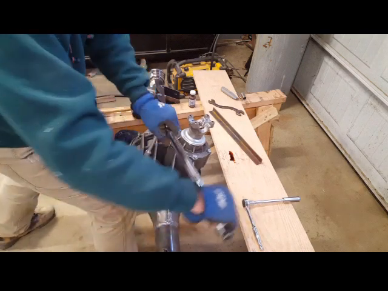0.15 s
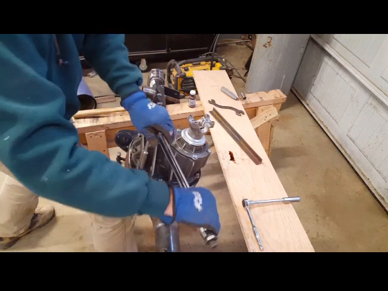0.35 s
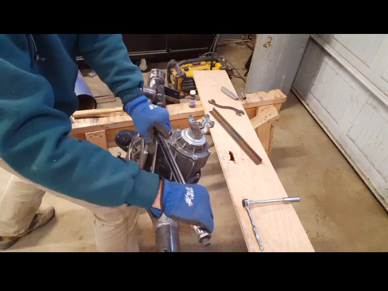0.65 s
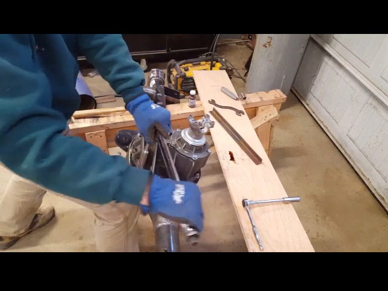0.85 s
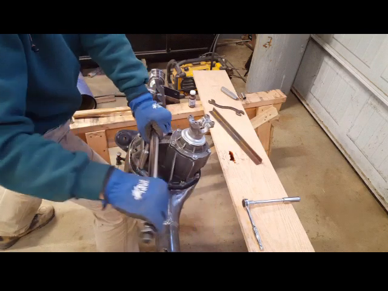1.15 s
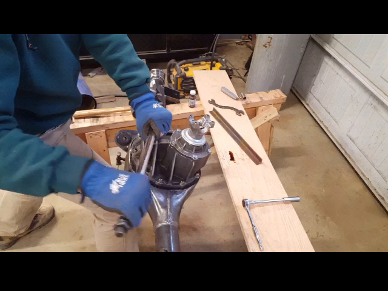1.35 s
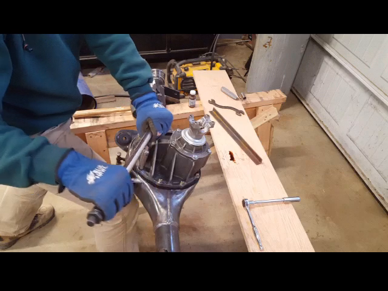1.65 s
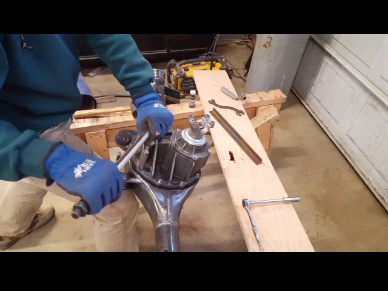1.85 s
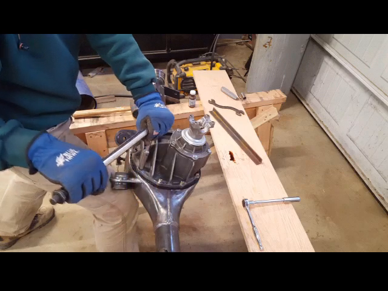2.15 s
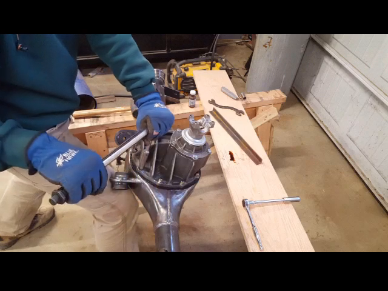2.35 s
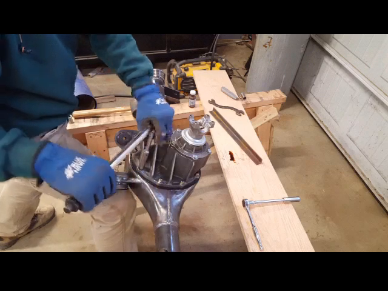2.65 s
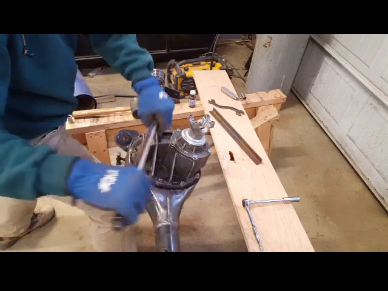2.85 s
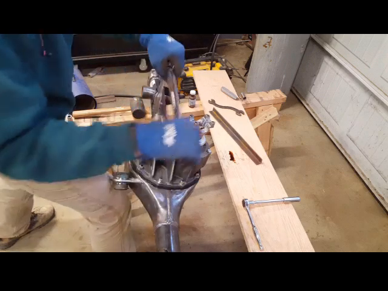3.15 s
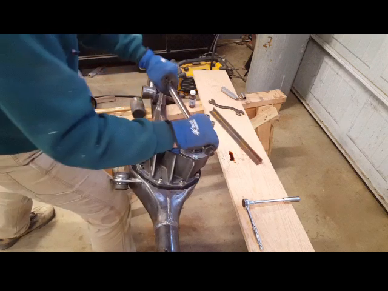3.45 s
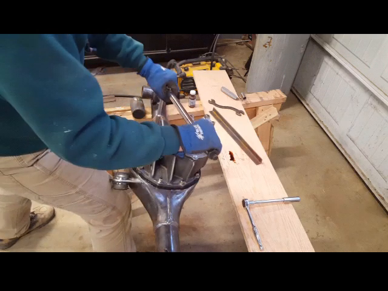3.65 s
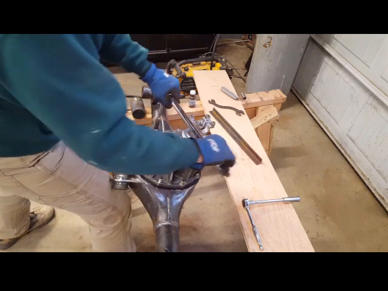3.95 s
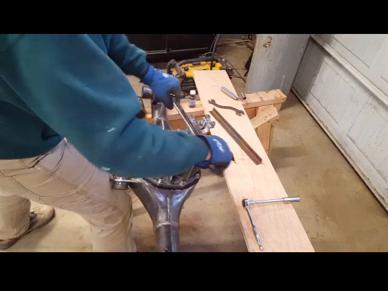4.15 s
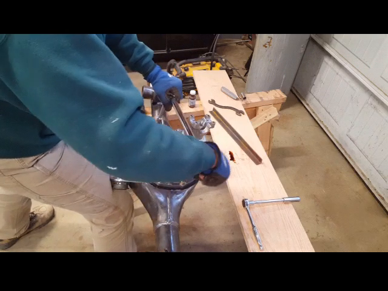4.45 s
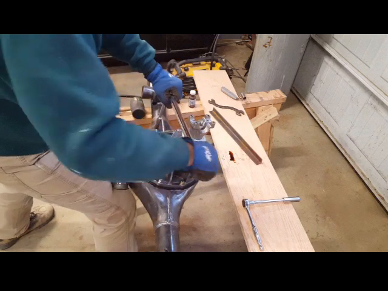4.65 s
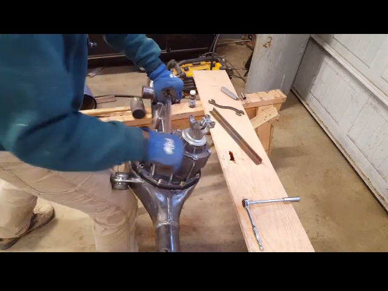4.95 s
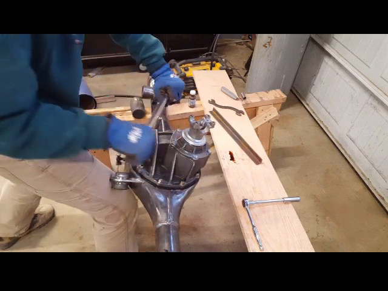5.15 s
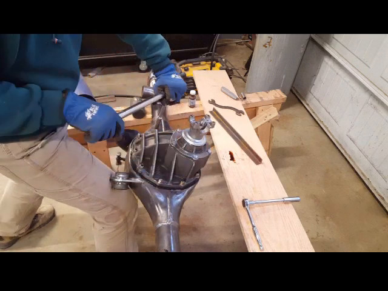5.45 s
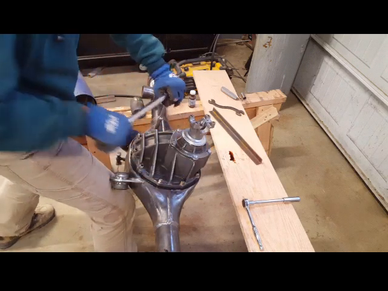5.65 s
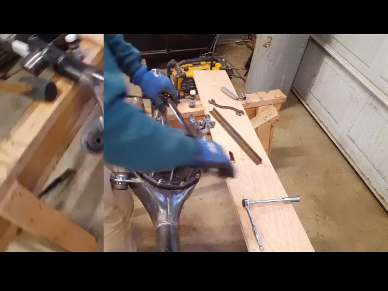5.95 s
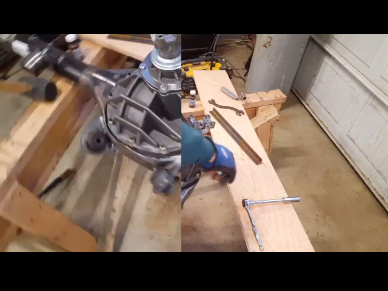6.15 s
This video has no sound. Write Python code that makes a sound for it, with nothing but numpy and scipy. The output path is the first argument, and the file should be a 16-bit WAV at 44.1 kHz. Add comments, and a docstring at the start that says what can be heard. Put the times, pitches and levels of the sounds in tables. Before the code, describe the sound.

Ratchet ticks and cloth rustle, then a torque wrench clicks loudly and snaps back; metal knocks ring on a heavy housing in a garage.

```python
"""A ratchet ticks over a quiet rumble while sleeves rustle, then a socket knocks on nuts and an axle housing.
A click-type torque wrench breaks over with a sharp click and snaps back; more knocks and ticks follow,
and a last click, cut short, begins just before the end. The housing rests on a wooden stand in a hard garage.
Each blow is filtered noise with a bass push, plus decaying modes of the wrench, ratchet head, housing
or axle tube; cloth and still air are coloured noise."""
import sys
import numpy as np
from scipy import signal
from scipy.fft import rfft, irfft
from scipy.io import wavfile
from scipy.ndimage import uniform_filter1d

SR = 44100
rng = np.random.default_rng(int(sys.argv[2]) if len(sys.argv) > 2 else 0)


def wav_out(sig):
    """Save sig, one row per channel (or a flat mono array), as 16-bit PCM at SR to the path in sys.argv[1]."""
    wavfile.write(sys.argv[1], SR, np.round(np.clip(np.atleast_2d(sig).T, -1, 1) * 32767).astype(np.int16))


N = 277561
BLOW_TIME = np.arange(SR) / SR  # seconds since a blow


def amp(db):
    """Decibel law: level to amplitude gain."""
    return 10 ** (np.asarray(db) / 20)


def unit(x):
    """Power normalisation: scales to rms 1."""
    return x / np.sqrt(np.mean(x ** 2) + 1e-20)


def read(points, hz):
    """Log-frequency interpolation of a table."""
    table_hz, value = np.transpose(points)
    return np.interp(np.log(hz + 1), np.log(table_hz + 1), value)


def fade(t, t60):
    """Exponential decay: 60 dB down after t60 seconds."""
    return np.exp(-np.log(1000) * t / np.maximum(t60, 1e-3))


def add(mix, start_s, sound):
    """Superposition: mixes a stereo sound in, dropping whatever falls outside the mix."""
    start = round(start_s * SR)
    sound = sound[:, max(-start, 0):]
    part = mix[:, max(start, 0):][:, :sound.shape[1]]
    part += sound[:, :part.shape[1]]


def blend(a, b, same):
    """Partial correlation: mixes independent b into a so that their likeness is same."""
    return same * a + np.sqrt(1 - same ** 2) * b


# likeness of sound at the two microphones: frequency_hz, likeness (1 = identical)
LIKENESS = [(60, .92), (290, .92), (640, .5), (1400, .2), (3000, 0)]


def pair_noise(size, likeness=LIKENESS):
    """Spatial coherence: white noise at two spaced microphones, alike in the bass, unrelated in the treble."""
    a, b = rfft(rng.standard_normal((2, size)))
    same = np.clip(read(likeness, np.fft.rfftfreq(size, 1 / SR)), -1, 1)
    return irfft(np.array([a, blend(a, b, same)]), size)


def coloured(x, db_at, size=4096):
    """Minimum-phase filtering: a causal, unit-energy filter with the relative response db_at(Hz)."""
    db = db_at(np.fft.rfftfreq(size, 1 / SR))
    cepstrum = irfft(np.log(amp(np.maximum(db - db.max(), -90))))
    # folding the cepstrum onto positive times makes the filter causal
    cepstrum[1:size // 2] *= 2
    cepstrum[size // 2 + 1:] = 0
    taps = irfft(np.exp(rfft(cepstrum)))
    taps /= np.linalg.norm(taps)
    return signal.fftconvolve(x, taps[None], axes=1)[:, :x.shape[1]]


# late decay of the garage: frequency_hz, t60_s
GARAGE_T60 = [(100, 2), (300, 0.89), (1000, 0.67), (2700, 0.84), (5000, 0.46), (9000, 0.44), (14000, 0.02)]
# reverberant over direct sound: frequency_hz, level_db
GARAGE_DB = [(150, 18), (400, 17), (900, 4.5), (2500, -4.5), (6000, -2), (13000, -6.5)]


def garage(x, build_s=0.0043, bass_lag=0.55, early_db=3, early_t60=0.16, bass_hz=450):
    """Room reverberation: direct sound, early reflections and a tail; bass builds last, power is shared."""
    hz, t, noise = signal.stft(pair_noise(SR), SR, nperseg=256)
    hz = hz[:, None]
    shape = fade(t, read(GARAGE_T60, hz)) + amp(early_db) * fade(t, early_t60)
    build = build_s * (1 + bass_lag / (1 + (hz / bass_hz) ** 2))
    shape *= 1 - np.exp(-(t / build) ** 2)
    shape /= np.sqrt((shape ** 2).sum(1, keepdims=True) * t[1] * SR)
    tail = signal.istft(noise * shape, SR, nperseg=256)[1][:, :SR]
    wet = amp(read(GARAGE_DB, np.fft.rfftfreq(2 * SR, 1 / SR)))
    response = (1 + wet * rfft(tail, 2 * SR)) / np.sqrt(1 + wet ** 2)
    return irfft(rfft(x, 2 * SR) * response)[:, :SR]


def treble_tilt(tilt, hz):
    """Contact hardness: a dB slope of tilt per octave, settling in above about 1500 Hz."""
    return tilt * np.log2(np.hypot(1, hz / 1500))


def contact(colour, t60, tilt, bass_db=0, clank_hz=1000, clank_db=0, rise_s=.0005, push_hz=900,
            clank_octaves=0.083):
    """Impact of steel on steel: one push in the bass, dense fast-dying vibration above."""
    clatter = pair_noise(SR) * fade(BLOW_TIME, t60) * (1 - np.exp(-BLOW_TIME / rise_s))
    push = np.linalg.norm(clatter[0]) * (BLOW_TIME == 0)
    low = signal.butter(2, push_hz, "low", fs=SR)
    high = signal.butter(2, push_hz, "high", fs=SR)
    blow = signal.lfilter(*low, push) + signal.lfilter(*high, clatter)

    def db_at(hz):
        """Additive decibels: contact colour, hardness, bass thump and the struck spot's own resonance."""
        thump = bass_db / (1 + (hz / 400) ** 2)
        octaves_away = np.log2((hz + 1) / clank_hz)
        clank = clank_db / (1 + (octaves_away / clank_octaves) ** 2)
        return read(colour, hz) + treble_tilt(tilt, hz) + thump + clank
    return garage(coloured(blow, db_at))


def ring(modes, rise_s, waver):
    """Modal decay: reflections make each mode flutter, high ones faster and less alike at the microphones."""
    out = np.zeros((2, SR))
    for hz, db, t60 in modes:
        knots = np.linspace(0, 1, num=round(2 * np.sqrt(hz)))  # times of the flutter's random values
        same = np.clip(read(LIKENESS, hz), -1, 1)
        offset = np.arccos(same) * rng.choice([-1, 1])
        phase = rng.uniform(0, 2 * np.pi) + np.array([[0], [offset]])
        draws = rng.standard_normal(size=(2, 2, 256))[..., :len(knots)]
        left, other = (np.interp(BLOW_TIME, knots, a + 1j * b) for a, b in draws)
        echoes = np.array([left, blend(left, other, same)])
        carrier = np.exp(1j * phase) * np.exp(2j * np.pi * hz * BLOW_TIME)
        out += amp(db) * fade(BLOW_TIME, t60) * ((1 + waver * echoes) * carrier).real
    return out * (1 - np.exp(-BLOW_TIME / rise_s))


# colour of the still air: frequency_hz, relative_level_db_per_hz
AIR = [(20, -17), (30, -17), (56, -4), (110, -7), (180, -12), (440, -17), (900, -20), (1700, -22.5),
       (5000, -27.5), (7000, -30), (14500, -32)]
# likeness of the air at the two microphones: frequency_hz, likeness
AIR_LIKENESS = [(60, .85), (130, .6), (290, .25), (640, 0)]
AIR_DB = -68.7  # rms level


def air():
    """Stationary noise: a low rumble under a faint even hiss."""
    noise = pair_noise(N, AIR_LIKENESS)
    return amp(AIR_DB) * unit(coloured(noise, lambda hz: read(AIR, hz), size=16384))


# lowest bending mode of the long axle tube: frequency_hz, level_db, t60_s
AXLE_TUBE = [(316, 0, .68)]


def tube_hum():
    """Lowest bending mode: the axle tube's low, hollow note."""
    return ring(AXLE_TUBE, rise_s=.015, waver=.25)


# wrench modes: frequency_hz, loaded_level_db, slack_level_db, t60_s
WRENCH = [(346, -10, -22, .45), (866, 3, -20, .3), (960, -10, -9, .33), (1075, -7, 5, .53),
          (1098, -9, -3, .3), (1880, -16, -8, .28), (2030, -4, -12, .3), (2240, -16, -11, .35),
          (2610, -6, -6, .3), (2668, 1, -1, .43), (3050, -9, -13, .3), (3535, -10, -4, .23),
          (3595, -14, -1, .23), (4180, 2, -12, .24), (4654, -6, -16, .2), (5478, -12, -7, .26),
          (6300, -16, -6, .2), (7900, -6, -9, .2), (8527, -12, -5, .17), (9360, -5, -7, .2),
          (9749, -9, -1, .21)]


def wrench_ring(load, tilt=0):
    """Boundary conditions: clamping on the nut rebalances the wrench's modes; a soft blow spares high ones."""
    load = np.clip(load, 0, 1)
    modes = []
    for hz, tight_db, slack_db, t60 in WRENCH:
        mode_db = load * tight_db + (1 - load) * slack_db + treble_tilt(tilt, hz)
        modes.append((hz, mode_db, t60))
    return ring(modes, rise_s=.003, waver=.5)


# ratchet head modes: frequency_hz, level_db, t60_s
RATCHET = [(1650, -4, .25), (1965, -2, .24), (2630, -3, .24), (4240, -4, .2), (5170, -3, .2),
           (5830, -3, .18), (8280, 2, .2)]


def head_ring():
    """Modal vibration of the ratchet head."""
    return ring(RATCHET, rise_s=0.0012, waver=1.0)


# pawl dropping over ratchet teeth: start_s, level_db, treble_tilt_db_per_octave
TICKS = [(-.06, -27, 7), (0.0254, -29.5, 5), (0.1122, -28.5, 5), (2.9957, -38, 0), (3.0429, -41, -3.5),
         (3.172, -42.5, 0.5), (4.488, -36, -0.5), (4.758, -43, -1.5), (6.0833, -55, 9.5), (6.1381, -29, 7),
         (6.1977, -28.5, 7.5)]
# colour of a tick: frequency_hz, relative_level_db_per_hz
TICK_COLOUR = [(100, -14), (250, -7), (650, -1), (1200, -5.5), (2200, 3.5), (4000, -6), (6800, -13.5),
               (8400, -12), (11000, -19.5), (14500, -29)]
PAWL_T60_S, PAWL_HUM_DB = 0.032, -34.5  # clatter decay; tube hum over the snap
# ringing over the snap (dB), and its change per dB/octave of tilt
HEAD_DB, HEAD_DB_PER_TILT = -33, 1.7
HANDLE_DB, HANDLE_DB_PER_TILT = -27.5, -1.0


def ticks():
    """Impact excitation: the pawl snaps onto the next tooth; crisp snaps ring the head, dull ones the handle."""
    out = np.zeros((2, N))
    for start_s, db, tilt in TICKS:
        snap = contact(TICK_COLOUR, PAWL_T60_S, tilt, rise_s=0.00015)
        head = amp(HEAD_DB + HEAD_DB_PER_TILT * tilt) * head_ring()
        handle = amp(HANDLE_DB + HANDLE_DB_PER_TILT * tilt) * wrench_ring(0)
        hum = amp(PAWL_HUM_DB) * tube_hum()
        add(out, start_s, amp(db) * (snap + head + handle + hum))
    return out


# sleeves and trousers moving: middle_s, half_length_s, level_db
RUSTLES = [(0.184, 0.21, -61.5), (0.742, 0.27, -67), (4.666, 0.28, -60.5), (5.495, 0.28, -72),
           (5.939, 0.19, -67), (6.068, 0.1, -62)]
# colour of rubbing cloth: frequency_hz, relative_level_db_per_hz
CLOTH = [(59, -52), (100, -21.5), (162, -11), (262, -14), (310, -7.5), (462, -11), (962, -14.5),
         (1160, -17), (8000, -29.5), (15000, -43.5)]


def rustle(grain_db=1.0):
    """Friction noise: cloth rubs in small uneven catches, swelling with each movement."""
    t = np.arange(N) / SR
    motion = sum(amp(db) * np.exp(-((t - middle_s) / half_s) ** 2) for middle_s, half_s, db in RUSTLES)
    catches = unit(uniform_filter1d(rng.standard_normal(N), size=400))
    rubbing = pair_noise(N) * amp(grain_db * catches)
    return motion * unit(coloured(rubbing, lambda hz: read(CLOTH, hz)))


# axle housing modes: frequency_hz, level_db, t60_s
HOUSING = [(604, 0, .5), (643, 1, .5), (744, -7, .4), (928, -3, .35), (1048, -4, .33), (1075, -11, .45),
           (1256, -8, .42), (1444, -8, .42), (1620, -8, .45), (1743, -6, .38), (2190, -13, .4),
           (2850, -13, .42), (3016, -10, .42)]


def housing_ring():
    """Inertia: the heavy housing takes a moment to start ringing."""
    return ring(HOUSING, rise_s=0.0038, waver=0.89)


# socket knocking on nuts and housing: start_s, level_db, treble_tilt_db_per_octave, clatter_t60_s,
# clank_pitch_hz, housing_ring_over_blow_db, tube_hum_over_blow_db
KNOCKS = [(0.3856, -41.5, -5, 0.043, 1010, -22.5, -19.5), (1.0412, -55, 2.5, 0.025, 1300, -38, -33),
          (1.0742, -26.5, -7, 0.034, 1430, -53, -47), (3.074, -45, -2.5, 0.12, 2300, -35, -35),
          (3.0895, -37, -3.5, 0.063, 1010, -48, -39), (3.9341, -29.5, 0, 0.071, 680, -17, -19.5),
          (4.0302, -31, 1.5, 0.13, 4800, -24.5, -4.5), (4.178, -20, 1.5, .16, 1037, -20, -36),
          (4.2033, -20, 2.5, 0.082, 2700, -10.5, -15.5), (4.283, -32.5, -9.5, 0.065, 604, -7.5, -5.5),
          (4.783, -52, -5, 0.071, 756, -19, -15.5), (5.944, -54.5, -4, .16, 960, -28, -6)]
# colour of a knock: frequency_hz, relative_level_db_per_hz
KNOCK_COLOUR = [(40, -31), (80, -16), (170, -10), (450, -12), (650, -9), (1050, -7), (1900, -11.5),
                (3000, -13.5), (4600, -20), (9500, -28), (14500, -37)]
KNOCK_CLANK_DB, KNOCK_CLANK_OCTAVES = 8, 0.19  # height and half-width of the struck spot's resonance
# the stand thumps more for a gentle blow and for one that rings the housing well
THUMP_DB, THUMP_PER_HOUSING_DB, THUMP_PER_LEVEL_DB = -1, 0.18, -0.1352
# wrench over the blow (dB), extra treble tilt (dB/octave), load (0-1)
JOLT_DB, JOLT_TILT, JOLT_LOAD = -22.5, -0.5, 0.46


def knocks():
    """Coupled vibration: the struck housing rings and thumps its wooden stand; the jolt rings the wrench."""
    out = np.zeros((2, N))
    for start_s, db, tilt, t60, clank_hz, housing_db, hum_db in KNOCKS:
        bass_db = THUMP_DB + THUMP_PER_HOUSING_DB * housing_db + THUMP_PER_LEVEL_DB * db
        blow = contact(KNOCK_COLOUR, t60, tilt, bass_db, clank_hz, KNOCK_CLANK_DB,
                       rise_s=0.00049, clank_octaves=KNOCK_CLANK_OCTAVES)
        jolt = amp(JOLT_DB) * wrench_ring(JOLT_LOAD, tilt + JOLT_TILT)
        housing = amp(housing_db) * housing_ring()
        hum = amp(hum_db) * tube_hum()
        add(out, start_s, amp(db) * (blow + jolt + housing + hum))
    return out


# wrench breaking over and snapping back: start_s, level_db, treble_tilt_db_per_octave, clank_pitch_hz,
# load (0 slack - 1 clamped)
CLICKS = [(2.4157, -12, 1, 877, 0.73), (2.7095, -11, 3, 1085, 0.01), (2.7152, -19.5, 1, 3600, 0.07),
          (6.2889, -15.5, -4.5, 1220, 0.5)]
# colour of a click: frequency_hz, relative_level_db_per_hz
CLICK_COLOUR = [(50, -38), (110, -21.5), (175, -15.5), (240, -25), (400, -22), (750, -13), (1500, -13.5),
                (2600, -7.5), (4200, -14), (5200, -18), (9700, -15.5), (14500, -29.5)]
SLAP_T60_S, SLAP_CLANK_DB, SLAP_RING_DB = 0.054, 7, -23.5  # clatter decay; clank height; ring over slap
SLACK_HUM_DB, LOAD_DAMPING_DB = -28.5, 23.5  # slack tube hum over slap; its loss at full load


def clicks():
    """Sudden release: the mechanism slips and slaps the handle tube; a slack wrench also shakes the axle tube."""
    out = np.zeros((2, N))
    for start_s, db, tilt, clank_hz, load in CLICKS:
        slap = contact(CLICK_COLOUR, SLAP_T60_S, tilt, 0, clank_hz, SLAP_CLANK_DB,
                       rise_s=0.00027, clank_octaves=0.07)
        wrench = amp(SLAP_RING_DB) * wrench_ring(load)
        hum = amp(SLACK_HUM_DB - LOAD_DAMPING_DB * load) * tube_hum()
        add(out, start_s, amp(db) * (slap + wrench + hum))
    return out


# stereo balance, the work lying slightly to the right: frequency_hz, left_minus_right_db
LEAN = [(60, -2), (110, -1), (200, -1.5), (380, -3), (700, -2), (1290, -1), (2380, -3), (4400, -3.5),
        (8120, -2.5), (15000, 5.5)]


def scene():
    """Level-difference stereo: tool and clothes lean between the channels, over the still air."""
    work = rfft(clicks() + ticks() + knocks() + rustle(), 2 * N)
    lean_db = read(LEAN, np.fft.rfftfreq(2 * N, 1 / SR))
    placed = irfft(work * amp([lean_db / 2, -lean_db / 2]))[:, :N]
    return placed + air()


EDGE_HZ = 15050


def record(dry):
    """Band limiting: a linear-phase low-pass removes the treble above the edge."""
    taps = signal.firwin(255, EDGE_HZ, window=("kaiser", 9), fs=SR)
    return signal.oaconvolve(dry, taps[None], "same")


dry = scene()
out = record(dry)
wav_out(out)
```